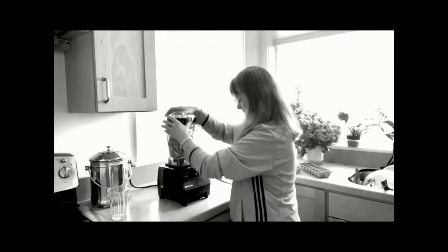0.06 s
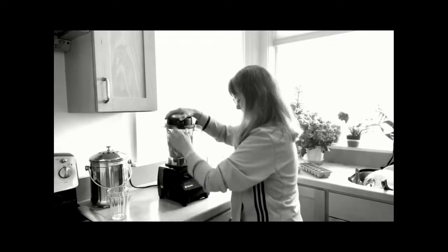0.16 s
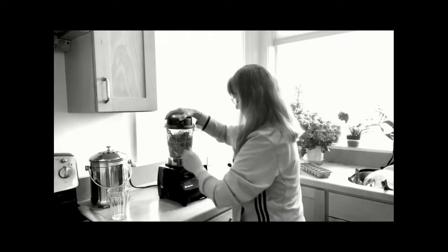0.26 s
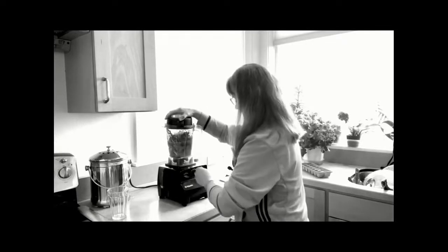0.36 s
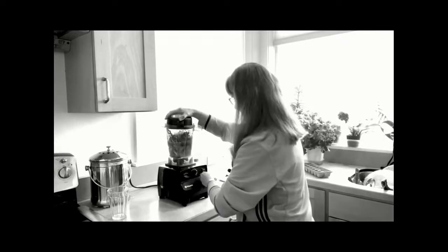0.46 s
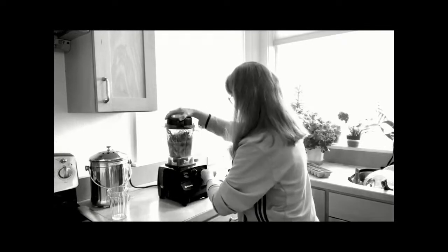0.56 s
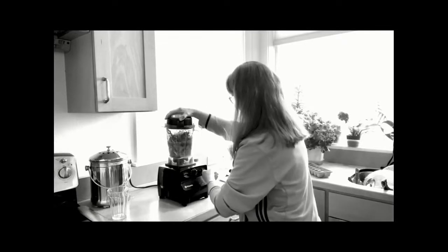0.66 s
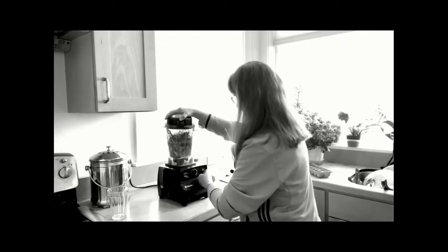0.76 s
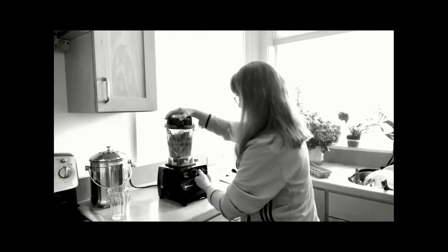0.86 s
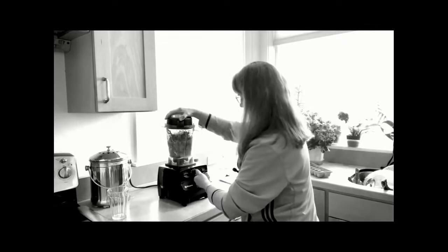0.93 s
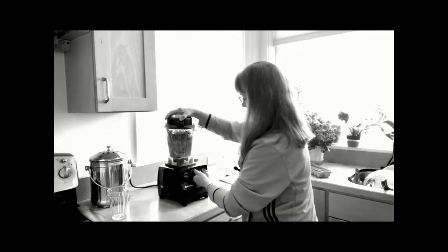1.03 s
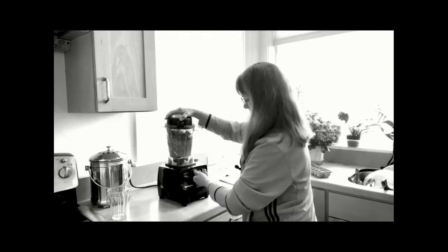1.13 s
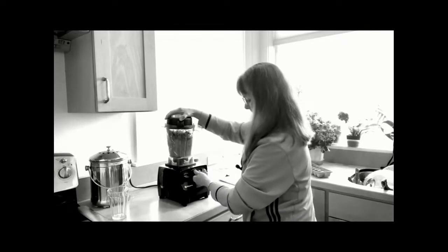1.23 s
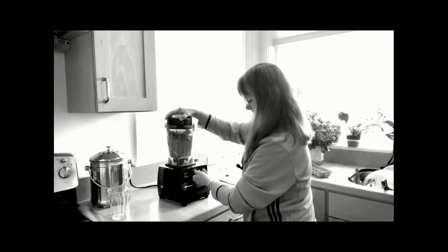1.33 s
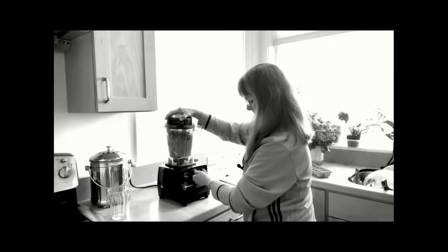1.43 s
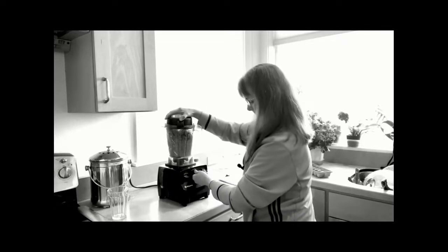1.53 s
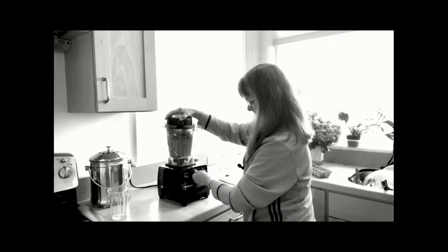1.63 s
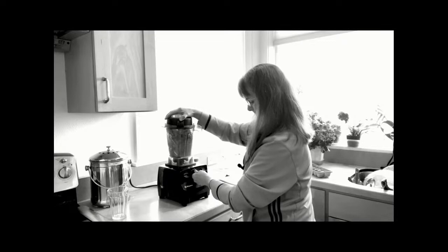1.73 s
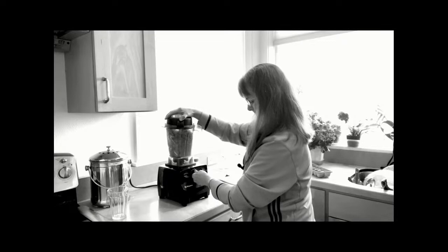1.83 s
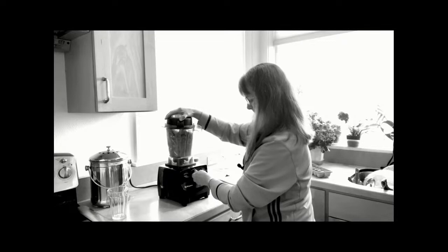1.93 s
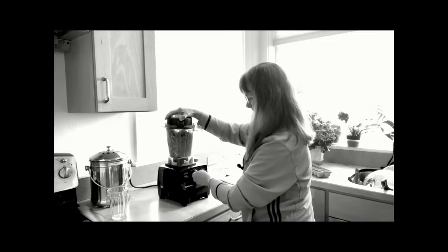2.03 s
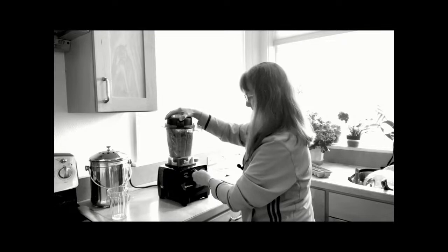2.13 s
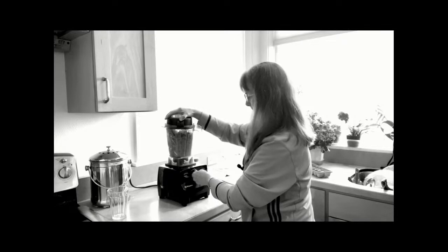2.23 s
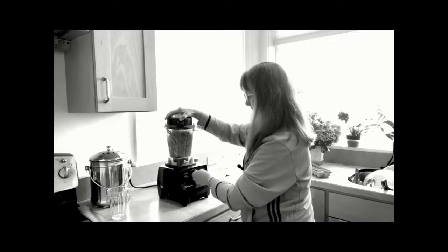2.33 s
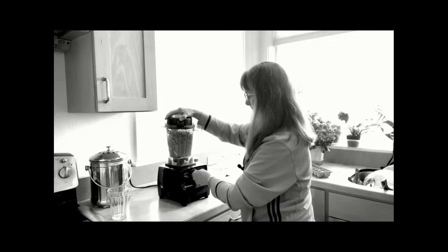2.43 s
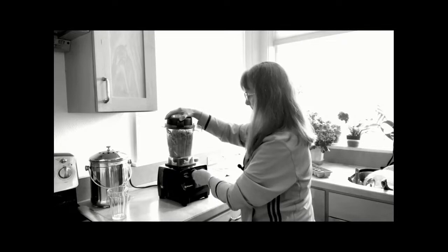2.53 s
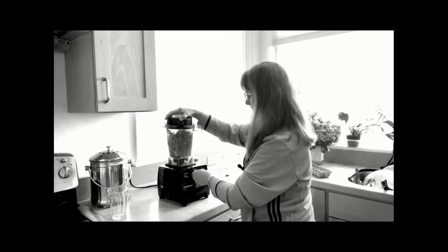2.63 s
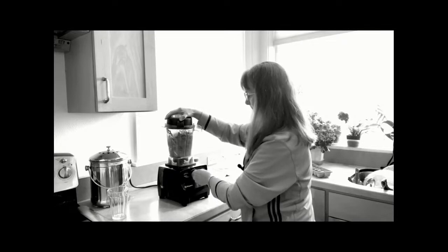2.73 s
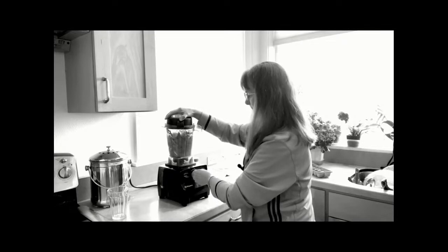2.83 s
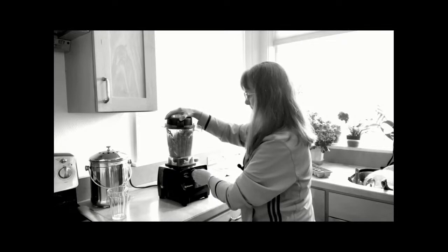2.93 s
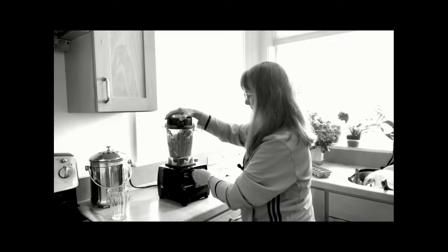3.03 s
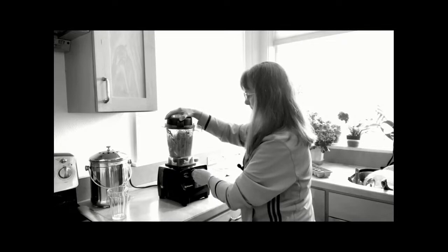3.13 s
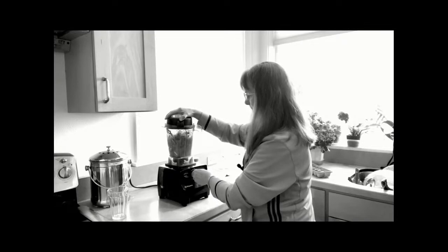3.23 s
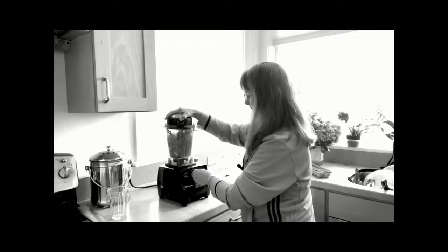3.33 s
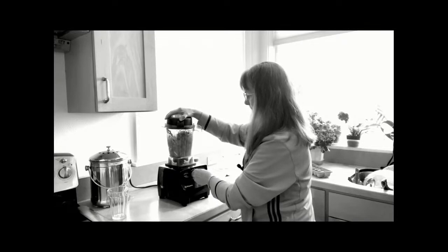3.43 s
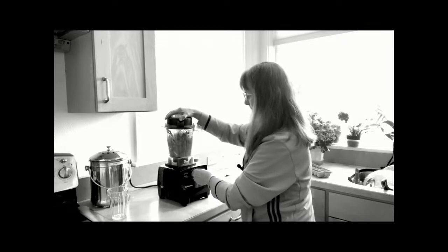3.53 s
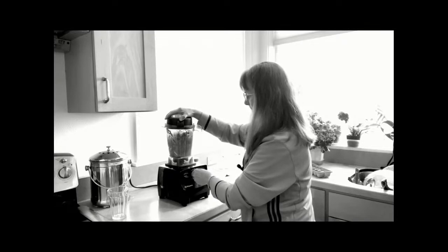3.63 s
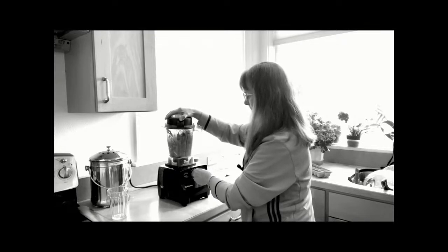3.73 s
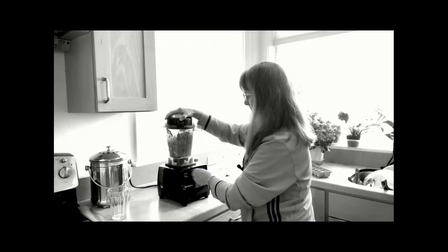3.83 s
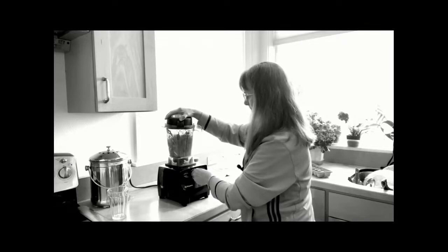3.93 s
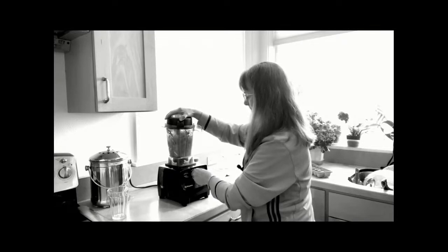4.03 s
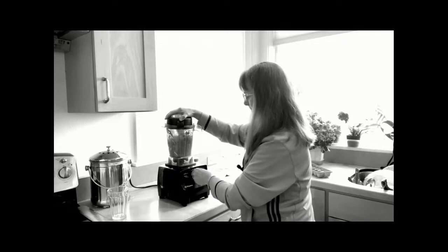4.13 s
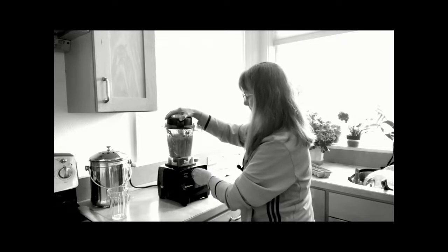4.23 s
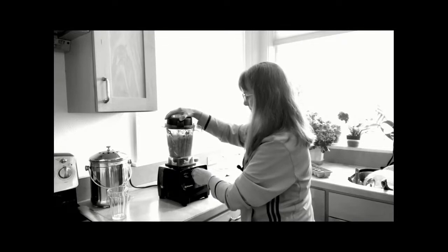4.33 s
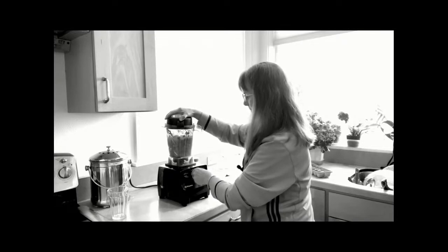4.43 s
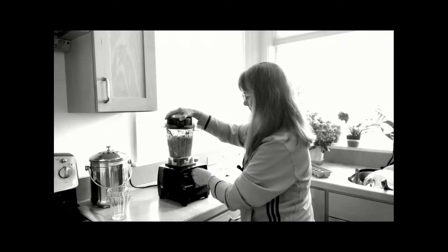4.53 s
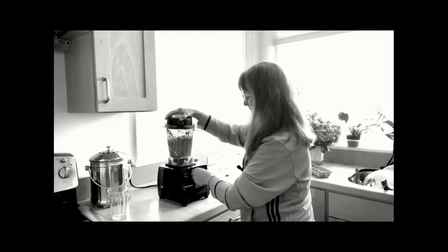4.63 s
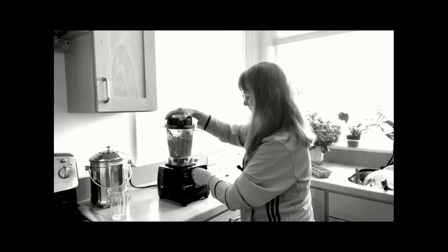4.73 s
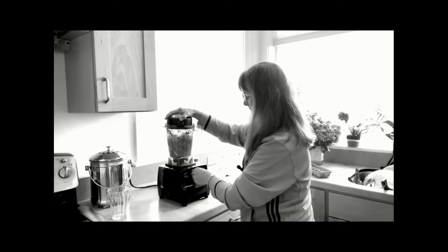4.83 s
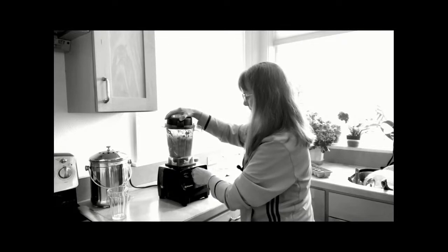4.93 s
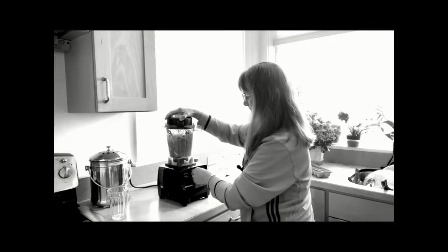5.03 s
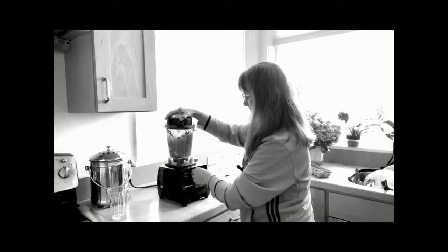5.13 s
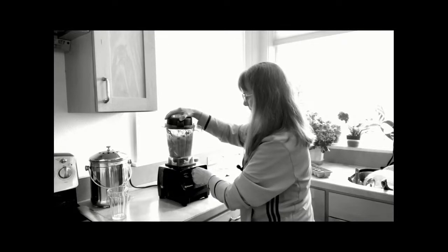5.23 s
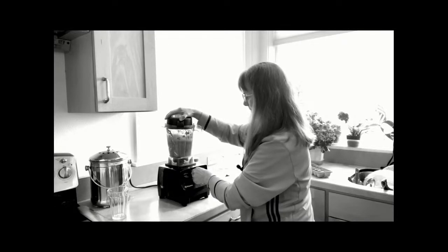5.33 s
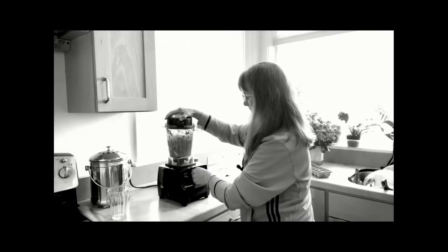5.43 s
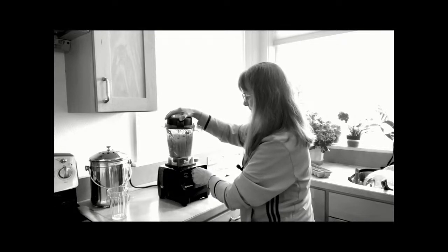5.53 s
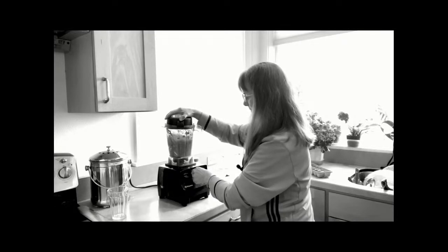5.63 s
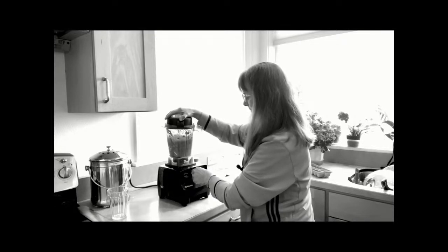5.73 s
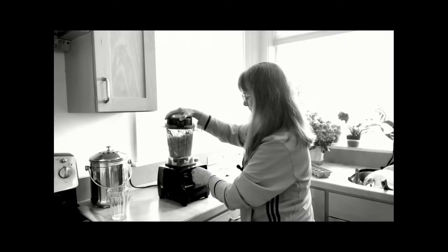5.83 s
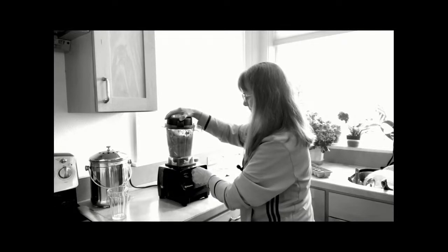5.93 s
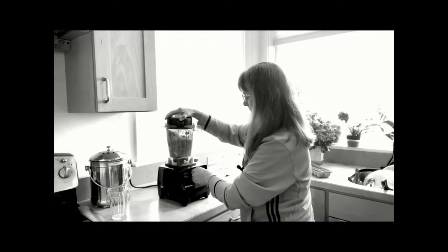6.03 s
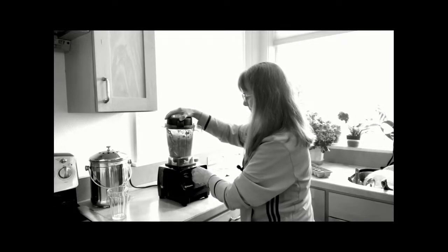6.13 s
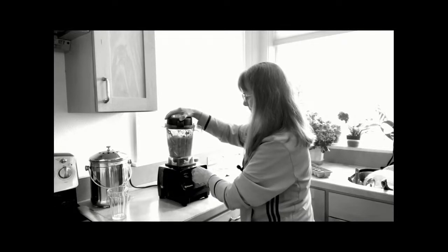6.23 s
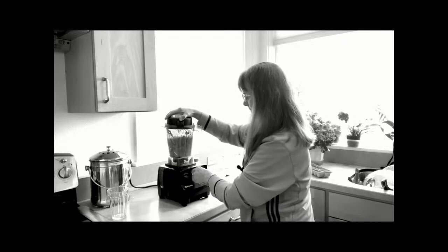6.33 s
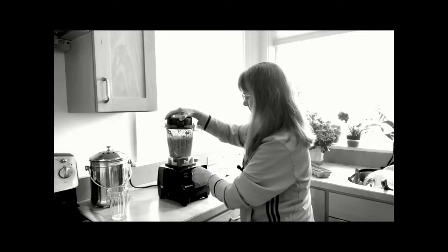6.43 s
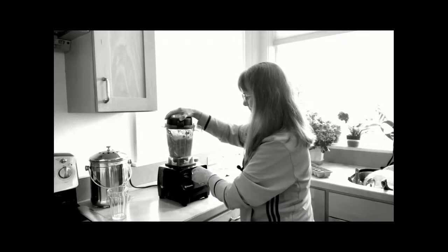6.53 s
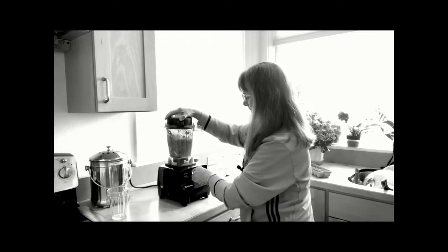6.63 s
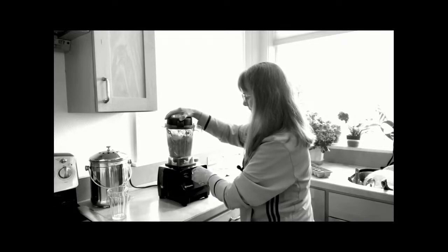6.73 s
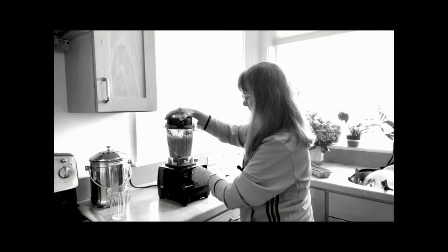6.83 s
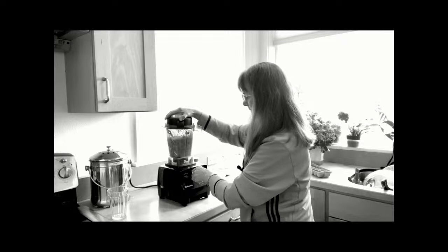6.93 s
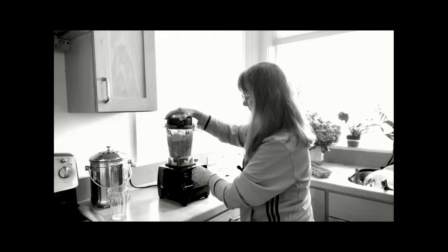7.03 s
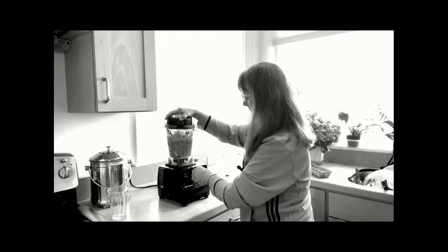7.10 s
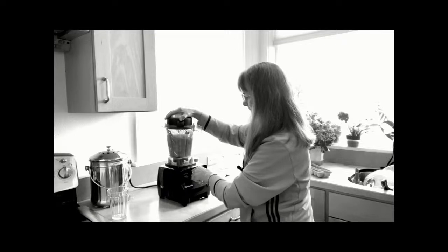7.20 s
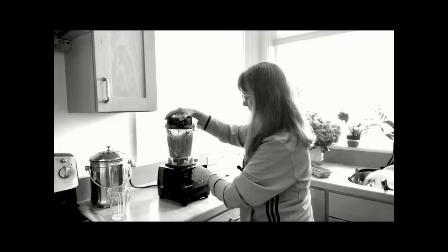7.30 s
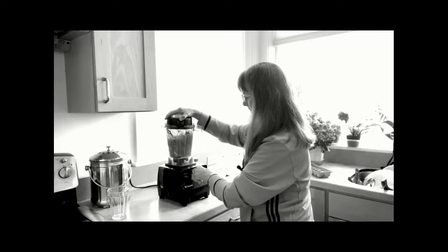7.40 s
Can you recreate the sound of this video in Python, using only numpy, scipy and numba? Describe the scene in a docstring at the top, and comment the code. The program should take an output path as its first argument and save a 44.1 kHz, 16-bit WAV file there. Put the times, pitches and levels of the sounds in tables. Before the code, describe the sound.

A blender lid thuds into place, a switch snaps, then ice cubes crack and clatter unevenly against the plastic jar in a kitchen.

```python
"""A kitchen: a countertop blender with ice in a plastic jar. The lid is pressed on with thuds and soft rim
ticks, a thin hiss flutters, a switch snaps twice, then the slow blades knock the cubes about. Each ice crack
is a cluster of damped modes plus a treble noise burst; each thud is a swelling ring of the jar and counter.
Random small blows make the tumbling and the rattle of chips, over faint whirr and room tone of shaped noise;
the kitchen answers with a short tail of fresh noise in bands."""
import sys
import numpy as np
from scipy import signal
from scipy.fft import rfft, irfft, next_fast_len
from scipy.io import wavfile
from scipy.ndimage import uniform_filter1d, minimum_filter1d
from numba import njit

SR = 44100
rng = np.random.default_rng(int(sys.argv[2]) if len(sys.argv) > 2 else 0)


def int16_out(signal):
    """Quantize to a 16-bit WAV file."""
    q = np.round(np.clip(np.atleast_2d(signal).T, -1, 1) * 32767)
    wavfile.write(sys.argv[1], SR, q.astype(np.int16))


N = 328986   # length in samples
TIME_S = np.arange(N) / SR


def from_db(db):
    """Level to amplitude: 20 dB is a factor of ten."""
    return 10 ** (np.asarray(db) / 20)


def rms_one(x):
    """Normalisation to unit root-mean-square."""
    return x / np.sqrt(np.mean(x ** 2) + 1e-20)


def at_hz(points, hz):
    """Spectral envelope: linear interpolation on a logarithmic frequency axis."""
    points = np.array(points)
    return np.interp(np.log(hz), np.log(points[:, 0]), points[:, 1])


def colour(x, spectrum):
    """Linear filtering: shapes x by a spectrum in dB over Hz, keeping the power of white input."""
    size = next_fast_len(len(x))
    gain = from_db(at_hz(spectrum, np.fft.rfftfreq(size, 1 / SR) + 1))
    return irfft(rfft(x, size) * rms_one(gain), size)[:len(x)]


@njit
def add(out, at, gain, w, r):
    """Two-pole resonance: adds dying sines by start sample, height, radians and shrink per sample."""
    for k in range(len(at)):
        now, following = 0., gain[k] * np.sin(w[k])
        feedback, loss = 2 * r[k] * np.cos(w[k]), r[k] * r[k]
        for i in range(at[k], min(len(out), at[k] + int(-6 / np.log(r[k])))):   # until e^-6
            out[i] += now
            now, following = following, feedback * following - loss * now


def ring(times, db, hz, t60, scatter_db, swell_s=0):
    """Modal superposition: blows in rows, modes in columns, each ring with its own strength and sign."""
    times, db, hz, t60 = np.broadcast_arrays(times, db, hz, t60)
    luck = rng.standard_normal(times.shape + (2,))
    gain = from_db(db + scatter_db * luck[..., 0]) * np.sign(luck[..., 1])
    gain = (gain * (hz < 15000)).ravel()
    at = (times * SR).astype(int).ravel()
    w = (2 * np.pi * hz / SR).ravel()
    r = from_db(-60 / (t60 * SR)).ravel()
    out = np.zeros(N)
    add(out, at, gain, w, r)
    if swell_s:   # a faster dying opposite sine hides the start
        add(out, at, -gain, w, r * np.exp(-1 / (swell_s * SR)))
    return out


def strike(times, peak_db, modes, favoured_hz=None, db_per_octave=0, scatter_db=2.0, detune=0.042, swell_s=0):
    """Selective modal excitation: modes far from the favoured pitch ring less; the load detunes them."""
    hz, level_db, t60 = np.transpose(modes)
    hz = hz * (1 + detune * rng.standard_normal((len(times), len(hz))))
    octaves_off = 0
    if favoured_hz is not None:
        octaves_off = np.abs(np.log2(hz / np.reshape(favoured_hz, (-1, 1))))
    db = peak_db[:, None] + level_db - db_per_octave * octaves_off
    return ring(times[:, None], db, hz, t60, scatter_db, swell_s)


# spectral envelope of fracture noise, which also weights the ice modes: (f/Hz, relative level/dB)
SPLINTER_SPECTRUM = [(800, 7.5), (3000, -3), (6300, -2), (7500, -17.5), (10000, -13), (13500, -12),
                     (14600, -45)]
# band edges between which one splinter differs from another: (f/Hz)
SPLINTER_EDGES_HZ = [2500, 4750, 7500, 12100]


def bursts(times, peak_db, decay_s, luck_db=None):
    """Impulsive noise: starts at once and decays exponentially; luck_db sets each burst's band balance."""
    at = np.minimum((np.asarray(times) * SR).astype(int), N - 1)
    size = next_fast_len(N)
    noise = rfft(colour(rng.standard_normal(N), SPLINTER_SPECTRUM), size)
    band = np.searchsorted(SPLINTER_EDGES_HZ, np.fft.rfftfreq(size, 1 / SR))
    if luck_db is None:
        band = band * 0   # a single band
    out = 0
    for k in range(band.max() + 1):
        band_db = 0 if luck_db is None else luck_db[:, k]
        clicks = np.bincount(at, from_db(peak_db + band_db), N)
        envelope = signal.lfilter([1], [1, -np.exp(-1 / (decay_s * SR))], clicks + 1e-18)
        out = out + envelope * irfft(noise * (band == k), size)[:N]
    return out


# spectral envelope of the room tone: (f/Hz, relative level/dB)
ROOM_TONE_SPECTRUM = [(100, -25), (274, -5), (1730, -27.5), (3840, -25), (13000, -31), (15000, -29)]


def room_tone():
    """Stationary random noise: a steady, faint background of fixed spectrum."""
    return from_db(-68.5) * colour(rng.standard_normal(N), ROOM_TONE_SPECTRUM)


# decay times of the tail before it is cut short: (f/Hz, T60/s)
KITCHEN_T60 = [(200, 0.24), (14000, 0.13)]
TAIL_HOLD_S, TAIL_FADE_S = 0.0092, 0.085   # centre and breadth of the cut


def kitchen(x):
    """Energy decay: in each band fresh noise follows past energy; cut short, it leaves a faint late fall."""
    step, tail = 64, 0   # samples per energy frame
    edges = 170 * 2 ** np.arange(0, 6.7, 1 / 3)   # third octaves
    t = np.arange(200) * step / SR
    white = rng.standard_normal((2, N))
    for k, (low, high) in enumerate(zip(edges, edges[1:])):
        band = signal.butter(2, [low, high], "band", fs=SR, output="sos")
        power = uniform_filter1d(signal.sosfilt(band, x) ** 2, size=step)[::step]
        fall = from_db(-120 * t / at_hz(KITCHEN_T60, np.sqrt(low * high)))   # power, hence 120
        fall = fall * np.clip(t / 0.00067, 0, 1) ** 2
        fall = fall * (0.02 + 1 / (1 + np.exp((t - TAIL_HOLD_S) / TAIL_FADE_S * 2)))
        held = np.convolve(power, fall / fall.sum())[:len(power)]
        level = np.interp(np.arange(N) / step, np.arange(len(held)), np.sqrt(np.abs(held)))
        tail = tail + level * rms_one(signal.sosfilt(band, white[k % 2]))
    return tail


# hand pressing the lid home: (t/s, relative thud level/dB, relative rim tick level/dB, favoured f/Hz)
LID = [(0.305, -47.5, -61, 400), (0.436, -29, -58, 234), (.523, -19, -33, 287)]
# modes of jar and counter before detuning: (f/Hz, relative level/dB, T60/s)
JAR = [(237.2, -2, 0.15), (272.9, 3.5, 0.063), (333.3, 4, 0.098), (387.8, 0, 0.089), (454.7, 5.5, 0.063),
       (598.7, -4, 0.11), (726, 1.5, 0.084), (788.6, -2.5, 0.056), (878.3, 2, 0.09), (1051.6, -7, 0.069),
       (1245, -2, 0.038)]
SWELL_S = 0.0033   # a soft contact takes this long to set the jar ringing


def lid():
    """Soft-contact excitation: the lid thuds on the jar's modes while its rim ticks as dulled noise."""
    s, thud_db, tick_db, hz = np.transpose(LID)
    thud = strike(s, thud_db, JAR, hz, db_per_octave=19.5, scatter_db=1.5, detune=0, swell_s=SWELL_S)
    dull = signal.butter(2, 5000, fs=SR, output="sos")
    return thud + signal.sosfilt(dull, bursts(s, tick_db, decay_s=0.021))


# level curve of a faint narrow hiss, before its flutter: (t/s, level/dB)
THIN_HISS = [(0.7, -64), (.86, -72), (1.0, -51.5), (1.22, -73)]
HISS_HZ, HISS_WIDTH_HZ = 6840, 700


def thin_hiss():
    """Narrow-band noise: one band of random noise whose level flutters."""
    edges = [HISS_HZ - HISS_WIDTH_HZ / 2, HISS_HZ + HISS_WIDTH_HZ / 2]
    band = signal.butter(2, edges, "band", fs=SR, output="sos")
    s, db = np.transpose(THIN_HISS + [(THIN_HISS[-1][0] + .05, -120)])   # fades out at the end
    flutter_db = 3.2 * rms_one(uniform_filter1d(rng.standard_normal(N), size=SR // 40))
    level = from_db(np.interp(TIME_S, s, db, left=-120) + flutter_db)
    return level * rms_one(signal.sosfilt(band, rng.standard_normal(N)))


# two snaps of the switch: (t/s, relative level/dB)
SWITCH = [(1.0005, -16.5), (1.018, -3)]
# modes of the switch: (f/Hz, relative level/dB, T60/s)
SWITCH_MODES = [(6070, 3.5, 0.014), (4240, -10, 0.0072), (2500, -7, 0.0076), (12100, -2.5, 0.0073),
                (816, -22, 0.081), (280, -10.5, 0.063)]


def switch():
    """Impact excitation: each snap rings fixed modes and adds a short noise burst."""
    s, db = np.transpose(SWITCH)
    snap = strike(s, db - 2.5, SWITCH_MODES, scatter_db=0, detune=0)
    return snap + bursts(s, db - 15.0, decay_s=0.0024)


# the blades catch the load and it tumbles for a moment: (t/s, length/s, relative shaking level/dB)
TUMBLES = [(1.333, 0.013, -11.5), (1.378, 0.06, -10.5), (1.506, 0.12, -5), (1.675, 0.22, -4.5),
           (1.95, 0.093, -5), (2.081, 0.057, -12), (2.193, 0.044, -4), (2.309, 0.027, -4.5),
           (2.499, 0.056, -10.5), (2.646, .11, -7), (2.781, 0.028, -10), (2.977, 0.019, -4.5),
           (3.058, 0.097, -9), (3.477, 0.044, -12.5), (3.604, 0.043, -14), (3.659, 0.087, -5),
           (3.795, 0.028, -9.5), (3.864, 0.054, -14.5), (3.999, .28, -7.5), (4.356, 0.08, -6.5),
           (4.472, 0.056, -12.5), (4.573, 0.013, -9), (4.804, 0.021, -14.5), (5.072, 0.052, -6),
           (5.179, 0.054, -6.5), (5.244, 0.033, -16.5), (5.379, 0.046, -8), (5.501, 0.18, -12.5),
           (5.63, 0.062, -7), (5.743, 0.038, -4), (5.843, 0.091, -8.5), (5.993, 0.052, -9),
           (6.079, 0.022, -11.5), (6.149, 0.11, -7), (6.297, 0.052, -17), (6.418, 0.13, -18),
           (6.812, 0.031, -9), (6.921, 0.076, -7.5), (7.056, .16, -6.5), (7.256, 0.071, -9.5),
           (7.367, 0.09, -7)]
START_S, SPIN_UP_DB_PER_S = 1.2, 293   # the blades begin to turn; the shaking climbs to the first tumble
CATCH_DB_PER_S, SETTLE_DB_PER_S = 1500, 478   # rise before a tumble, fall after it
LULL_DB = -31.5   # relative shaking between tumbles


def shaking_db():
    """Level envelope: each tumble rises fast, holds and settles; the strongest one sets the shaking."""
    t = np.arange(0, N, 32) / SR
    s, length, db = np.transpose(TUMBLES)[..., None]
    rise = CATCH_DB_PER_S * np.maximum(s - t, 0)
    settle = SETTLE_DB_PER_S * np.maximum(t - s - length, 0)
    tumbling = np.maximum((db - rise - settle).max(axis=0), LULL_DB)
    spin_up = np.where(t > START_S, db[0] - SPIN_UP_DB_PER_S * (s[0] - t), -120)
    return np.interp(TIME_S, t, np.where(t < s[0], spin_up, tumbling))


def random_blows(per_s, spread_db):
    """Poisson-like process: times and uneven strengths of small collisions."""
    times = np.flatnonzero(rng.random(N) < per_s / SR) / SR
    return times, spread_db * np.minimum(rng.exponential(1, len(times)), 3.0)


def latest(events, times):
    """Causality: row of the last event before each time, or the first row if there is none."""
    return np.clip(np.searchsorted(np.array(events)[:, 0], times) - 1, 0, None)


# modes of a chunk, before small detuning: (multiple of its reference f, relative level/dB, T60/cycles)
ICE = [(0.616, -4, 12), (1.004, 0, 46), (1.451, -8.5, 78), (1.7, -4, 30), (2.1, -13.5, 120),
       (2.9, -19, 120)]


def ice(times, peak_db, chunk, balance_db):
    """Modal scaling: smaller chunks ring higher, and each keeps its own balance of modes as it chatters."""
    multiple, level_db, cycles = np.transpose(ICE)
    detune = 1 + 0.03 * rng.standard_normal((len(times), len(ICE)))
    hz = np.array(CRACKS)[chunk, 2:3] * multiple * detune
    db = peak_db[:, None] + level_db + balance_db[chunk] + at_hz(SPLINTER_SPECTRUM, hz)
    return ring(times[:, None], db, hz, cycles / hz, scatter_db=3.5)


DEBRIS_DB = -39   # relative rattle of chips between tumbles
ICE_JOINS_DB_PER_S = 101   # the cubes begin to rattle later than the jar begins to shake
SAME_CHUNK = 0.46   # share of rattle blows assigned to the chunk that cracked last; the rest are random


def jar_rumble():
    """Random modal excitation: tumbling pieces ring the jar in the colour of the last big blow."""
    s, db = random_blows(110, 3.8)
    early_s = np.maximum(TUMBLES[0][0] - s, 0)[:, None]
    duller = 1.25 + 60 * early_s   # slow blades stir only the low rings
    hz = np.array(THUDS)[latest(THUDS, s), 2]
    rumble = strike(s, db, JAR, hz, db_per_octave=duller, scatter_db=9.5, swell_s=SWELL_S)
    # level the rumble so that the churn alone sets its strength
    return rumble / np.sqrt(uniform_filter1d(rumble ** 2, size=SR // 20) + 1e-9)


def ice_rattle(balance_db):
    """Dense random impacts: chips ring and splinter too often to be heard one by one."""
    s, db = random_blows(520, 6.4)
    any_chunk = rng.integers(0, len(CRACKS), len(s))
    chunk = np.where(rng.random(len(s)) < SAME_CHUNK, latest(CRACKS, s), any_chunk)
    ringing = rms_one(ice(s, db, chunk, balance_db))
    splinters = rms_one(bursts(s, db, decay_s=0.0022, luck_db=1.53 * balance_db[chunk]))
    rattle = ringing + from_db(2.5) * splinters
    # level the rattle partly, so that single blows stand out less
    return rms_one(rattle / (uniform_filter1d(rattle ** 2, size=SR // 30) + 1e-9) ** 0.1)


def churn(balance_db):
    """Level-dependent spectrum: ice grows faster than jar rumble, so a harder churn is brighter."""
    churn_db = shaking_db()
    late_db = ICE_JOINS_DB_PER_S * np.maximum(TUMBLES[0][0] - TIME_S, 0)
    rattle_db = np.maximum(1.264 * churn_db - 8.5, np.minimum(DEBRIS_DB, churn_db)) - late_db
    # unlike the rumble, the rattle is normalised as a whole
    return from_db(churn_db - 5.0) * jar_rumble() + from_db(rattle_db) * ice_rattle(balance_db)


# ice cracking on blade or wall:
# (t/s, relative level/dB, reference f of the chunk/Hz, relative splinter level against the crack/dB)
CRACKS = [(1.343, -11.5, 1900, -44), (1.473, -12.5, 2150, -12), (1.5044, -2, 1990, -42),
          (1.587, -7, 2960, -25), (1.672, -0.5, 3350, -19), (1.8887, -0.5, 2190, -33),
          (1.992, 2, 1970, -20), (2.0775, 12.5, 2000, -18), (2.304, -11, 2030, -3),
          (2.4249, -19, 1590, -10), (2.503, -0.5, 2046, -5.5), (2.7771, -6, 2210, -9),
          (2.798, -8, 2160, -22), (2.9062, -2, 2070, -12), (2.9847, 1, 2230, -9.5), (3.0543, 2, 6400, -24),
          (3.088, 0, 5470, -17), (3.1289, -8.5, 4600, -8), (3.252, -14, 2500, -42),
          (3.3863, -3.5, 3030, -17), (3.478, -22, 2100, -33), (3.5663, -2.5, 1900, -21),
          (3.6236, -5, 2570, -45), (3.6652, -7, 2280, -7.5), (3.708, -7.5, 2090, -5),
          (3.741, 0.5, 2970, -16), (3.791, -6.5, 2660, -15), (3.936, -0.5, 5570, -22),
          (4.031, -1, 1900, -18), (4.053, 0.5, 2430, -15.5), (4.283, -3, 2280, -22), (4.3518, 7, 2140, -7),
          (4.481, 4, 1940, -17.5), (4.494, 5, 2670, -25), (4.5294, -1, 1830, -19.5),
          (4.576, -2.5, 5660, -10.5), (4.7883, -5, 4400, -42), (4.806, 3, 2350, -17.5),
          (4.9296, -4, 1904, -27), (5, -18, 2650, -66.5), (5.181, -9.5, 5160, -3), (5.4067, -7, 1940, -15),
          (5.5026, -1, 2020, -23), (5.532, -4.5, 2720, -22.5), (5.611, -8, 2270, -15),
          (5.637, -1, 2960, -26), (5.8448, -2, 2500, -17), (5.8717, 12, 2480, -15),
          (6.0329, 2.5, 2780, -42), (6.1529, -2, 3830, -6), (6.216, -10.5, 1750, -4),
          (6.3038, -23, 1457, -1), (6.426, -6, 2820, -23), (6.469, -14, 2810, -10),
          (6.5225, -4.5, 4970, -11.5), (6.649, -12.5, 7700, -24), (6.7476, -13.5, 6070, -32),
          (6.907, -2, 4420, -35), (6.926, 6.5, 4740, -19.5), (6.982, -4, 3300, -20), (7.107, 6, 5660, -17),
          (7.263, 11, 5470, -14.5), (7.3697, 7.5, 2820, -11)]


def cracks(balance_db):
    """Brittle fracture: a chunk rings and splinters in the treble, then chatters in weaker after-blows."""
    s, db, _, splinter_db = np.transpose(CRACKS)
    chunk = np.arange(len(s))
    lag, loss = np.moveaxis(rng.random((len(s), 7, 2)), -1, 0)   # seven after-blows each
    later = s[:, None] + .003 + 0.036 * lag
    weaker_db = db[:, None] - 9.0 - 15.2 * loss - 9.0 * lag
    s, db = np.append(s, later), np.append(db, weaker_db)
    chunk = np.append(chunk, np.repeat(chunk, 7))
    burst_db = db + splinter_db[chunk] + 11.5
    splinters = bursts(s, burst_db, decay_s=0.0039, luck_db=1.01 * balance_db[chunk])
    treble = signal.lfilter(*signal.butter(1, 3000, "high", fs=SR), splinters)
    return ice(s, db - 3.5, chunk, balance_db) + treble


# cubes thudding on the jar: (t/s, relative level/dB, favoured f/Hz)
THUDS = [(1.388, -1, 258), (1.811, -7, 384), (2.086, 4, 443), (2.306, -5, 920), (2.501, 6, 394),
         (2.651, -5.5, 435), (2.834, -2, 600), (2.908, -6, 264), (3.061, -10, 385), (3.32, -11.5, 483),
         (3.452, -10, 390), (3.661, 0, 403), (3.704, -11, 340), (3.825, -7.5, 523), (3.875, -8, 370),
         (3.904, -8.5, 378), (4.133, -6, 363), (4.185, -7, 690), (4.356, 2, 870), (4.643, -10.5, 346),
         (4.657, -10, 870), (4.79, -9, 422), (4.931, -7.5, 256), (5.073, -8.5, 380), (5.181, -8, 660),
         (5.214, -10.5, 443), (5.31, -11, 327), (5.396, -3, 304), (5.634, -10, 398), (5.68, -9, 454),
         (5.752, -8, 385), (5.87, -1.5, 645), (6.349, -18, 332), (6.525, -14, 317), (6.645, -16, 795),
         (6.817, -4, 415), (6.929, -7, 370), (7.023, -8.5, 297), (7.057, -3.5, 430), (7.196, -8, 230),
         (7.269, -8.5, 345), (7.409, -3, 277)]


def thuds():
    """Extended contact: the jar is pushed several times in a few milliseconds, so its ring swells."""
    s, db, hz = np.transpose(THUDS)
    s = s - SWELL_S / 2   # the push begins before the ring is heard
    out = strike(s, db + 1.0, JAR, hz, db_per_octave=15.0, swell_s=SWELL_S)
    for _ in range(2):
        again = s + rng.uniform(0.003, 0.011, len(s))
        out = out + strike(again, db - 13.5, JAR, hz, db_per_octave=1.5, swell_s=SWELL_S)
    return out


# spectral envelope of the whirr: (f/Hz, relative level/dB)
MOTOR_SPECTRUM = [(300, 6), (1500, -30.5), (6300, -34.5), (9000, -55)]
WHIRR_DB, WHIRR_START_S, FADE_IN_S = -37.5, 1.5, 0.14


def motor():
    """Broadband noise: a faint, even whirr that fades in under the ice once the tumbling has begun."""
    fade = np.clip((TIME_S - WHIRR_START_S) / FADE_IN_S, 0, 1)
    return from_db(WHIRR_DB) * fade ** 2 * colour(rng.standard_normal(N), MOTOR_SPECTRUM)


def scene():
    """Superposition: direct sounds, the kitchen's tail and the room tone add linearly."""
    balance_db = 3.4 * rng.standard_normal((len(CRACKS), len(ICE)))   # each chunk has its own shape
    quiet = room_tone()
    blender = lid() + switch() + churn(balance_db) + cracks(balance_db) + thuds()
    tail = from_db(-9.0) * kitchen(blender + quiet)
    return (quiet + tail + thin_hiss() + blender + motor())[None]


BASS_CUT_HZ, TREBLE_STOP_HZ = 239.2, 15700 * 1.03


def record(dry):
    """Band limiting and gain control: bass cut but for a small bump, fast limiter on loud blows, top cut."""
    bump = signal.sosfilt(signal.butter(2, [108, 135], "band", fs=SR, output="sos"), dry)
    x = signal.sosfilt(signal.butter(10, BASS_CUT_HZ, "high", fs=SR, output="sos"), dry)
    x = x + from_db(-13.0) * bump
    gain = minimum_filter1d(np.minimum(1, 1.02 / (np.abs(x) + 1e-9)), size=200)
    x = np.clip(x * uniform_filter1d(gain, size=160), -.98, .98)
    return signal.sosfilt(signal.cheby2(12, 70, TREBLE_STOP_HZ, fs=SR, output="sos"), x)


dry = scene()
out = record(dry)
int16_out(out)
```